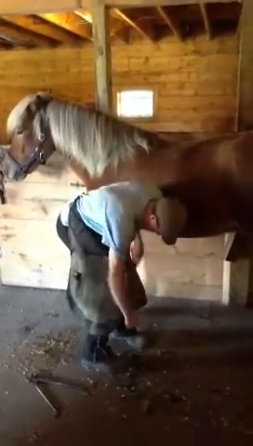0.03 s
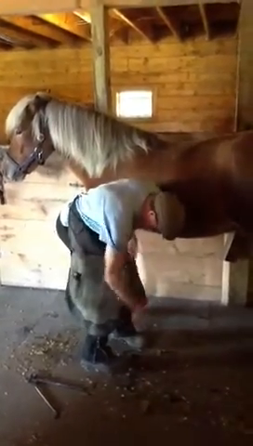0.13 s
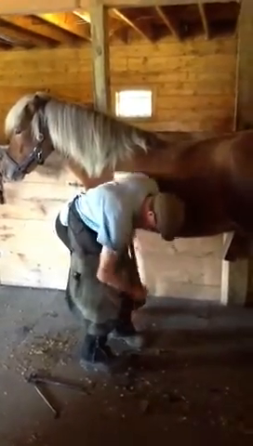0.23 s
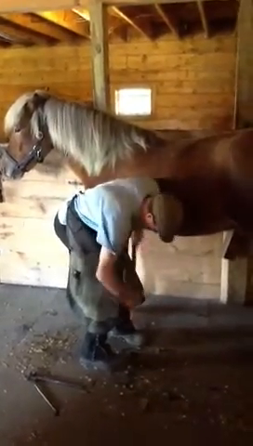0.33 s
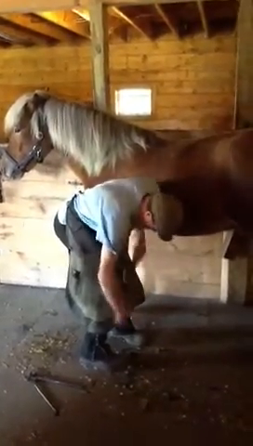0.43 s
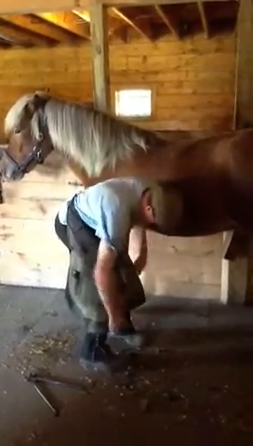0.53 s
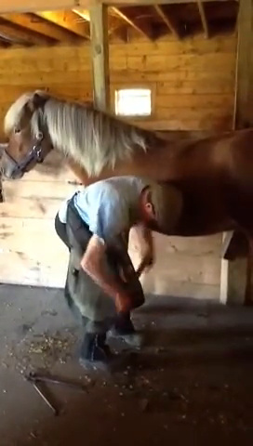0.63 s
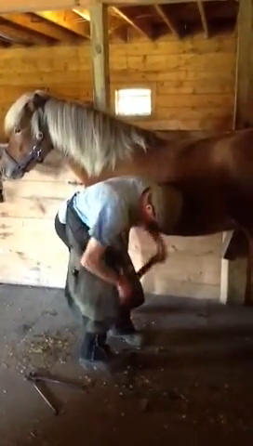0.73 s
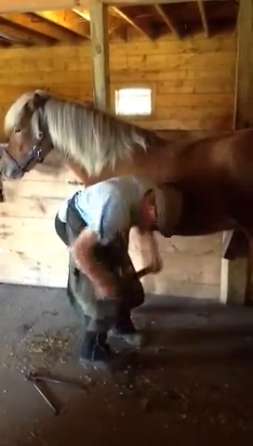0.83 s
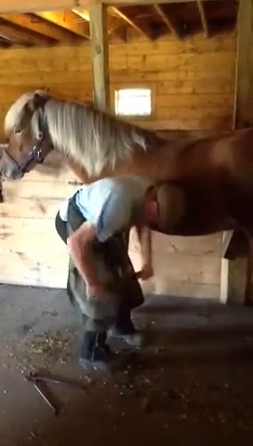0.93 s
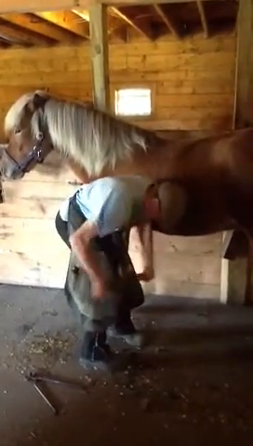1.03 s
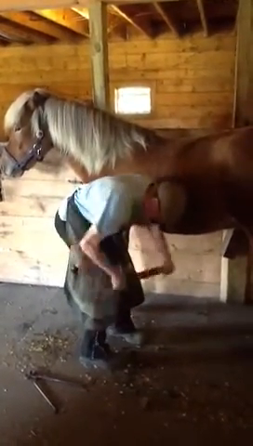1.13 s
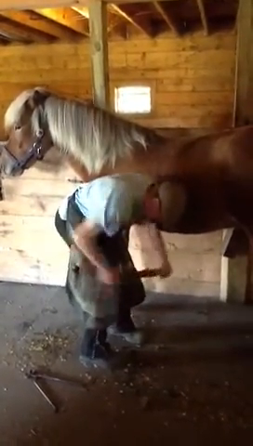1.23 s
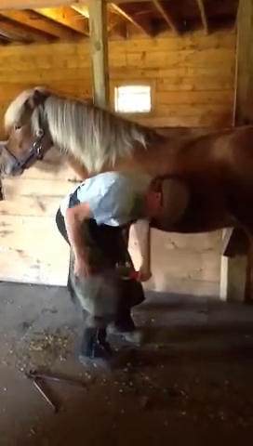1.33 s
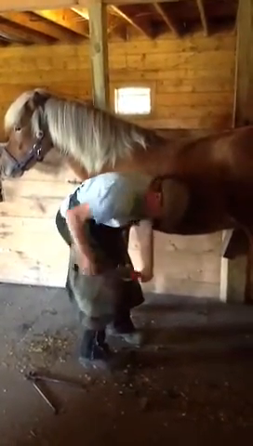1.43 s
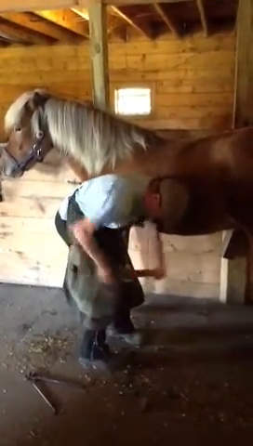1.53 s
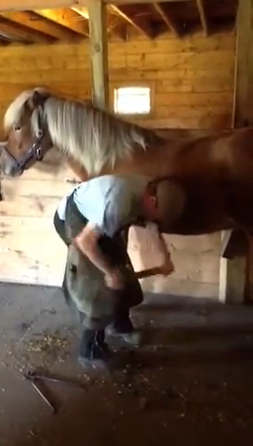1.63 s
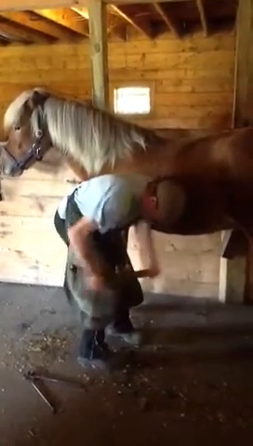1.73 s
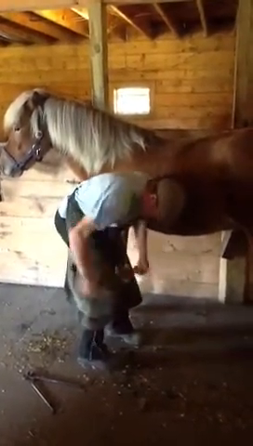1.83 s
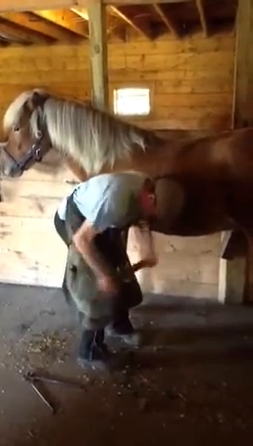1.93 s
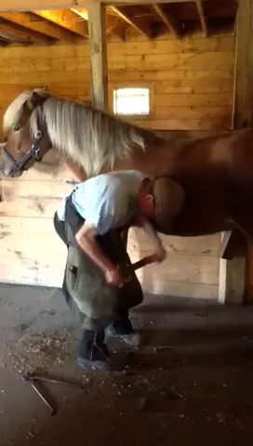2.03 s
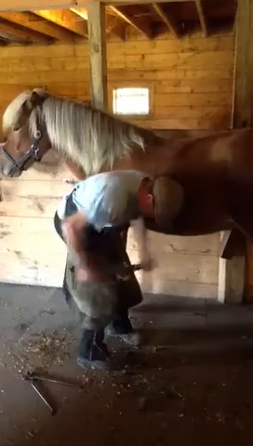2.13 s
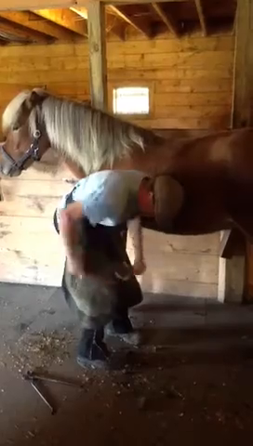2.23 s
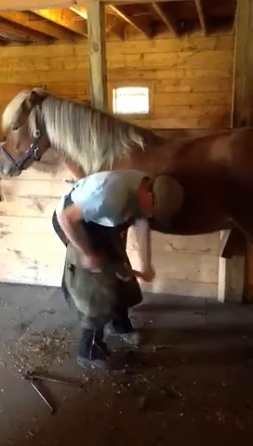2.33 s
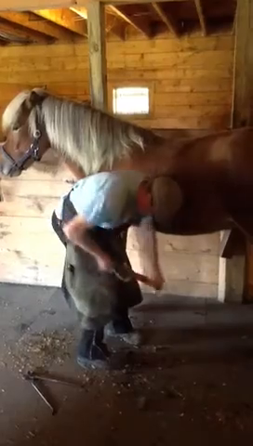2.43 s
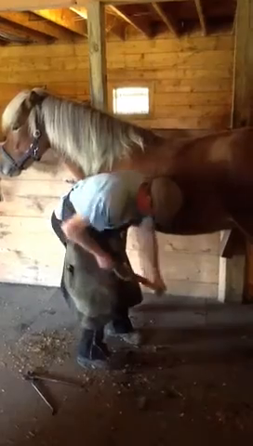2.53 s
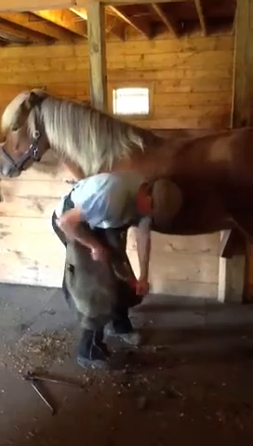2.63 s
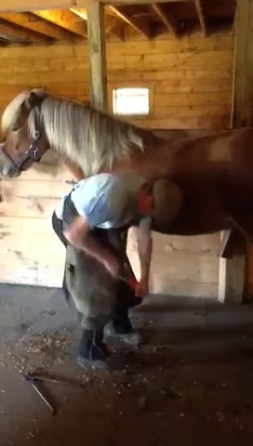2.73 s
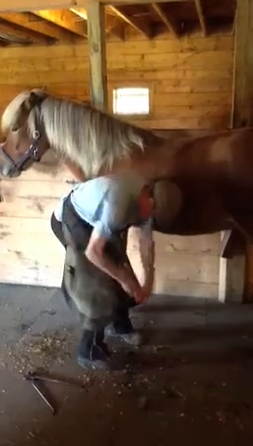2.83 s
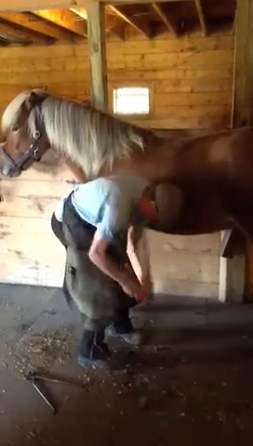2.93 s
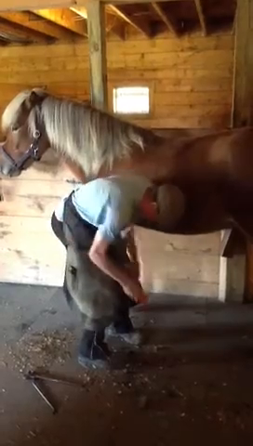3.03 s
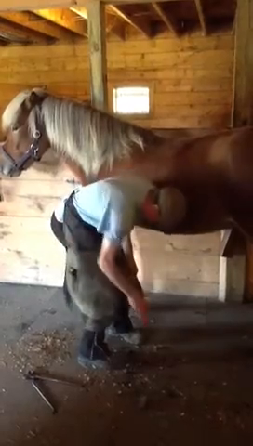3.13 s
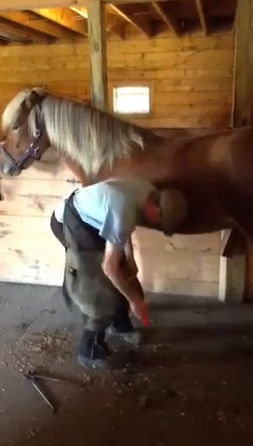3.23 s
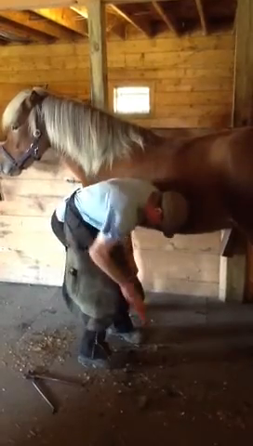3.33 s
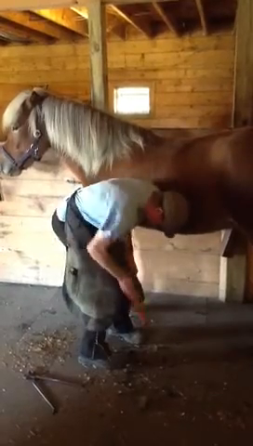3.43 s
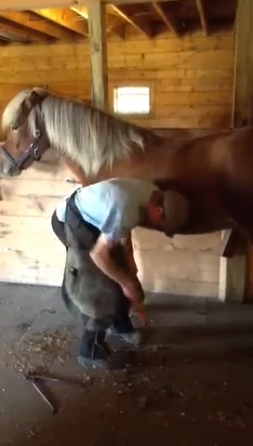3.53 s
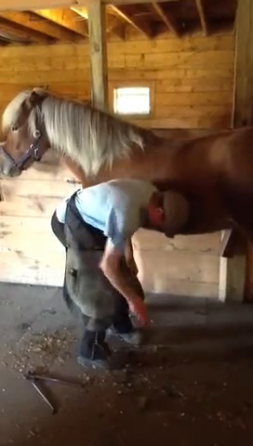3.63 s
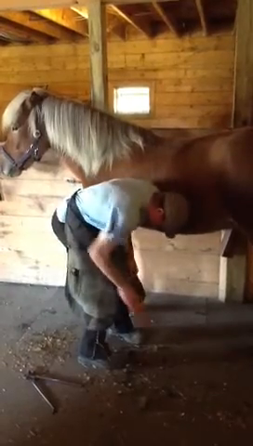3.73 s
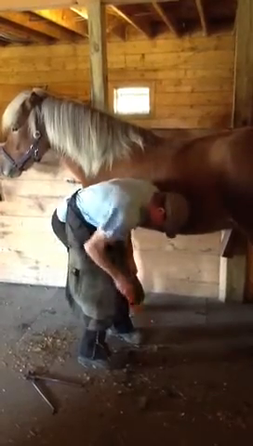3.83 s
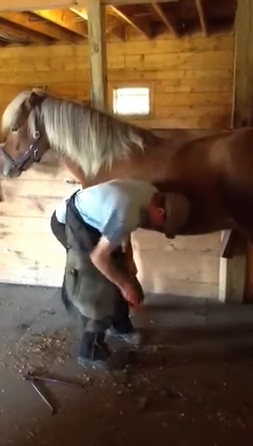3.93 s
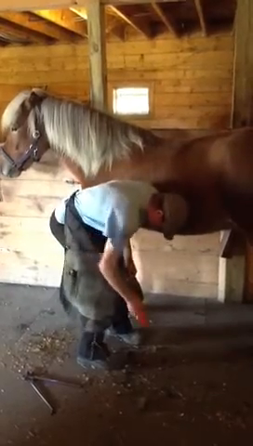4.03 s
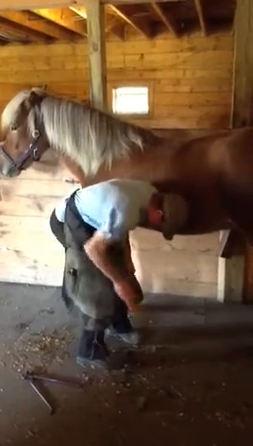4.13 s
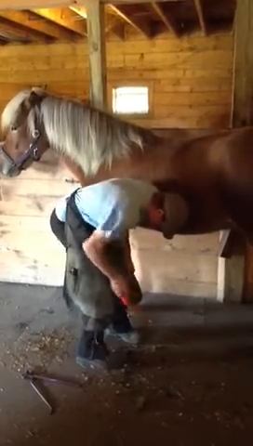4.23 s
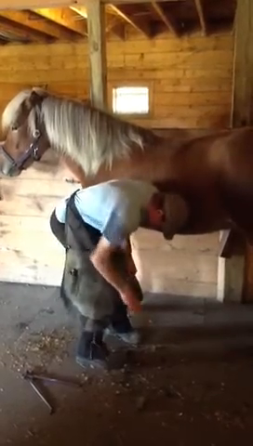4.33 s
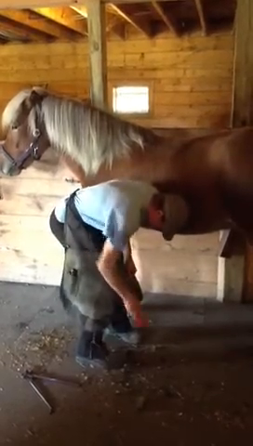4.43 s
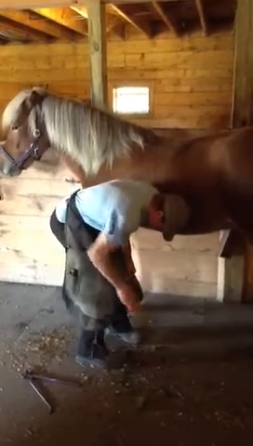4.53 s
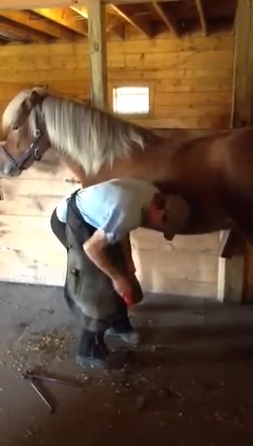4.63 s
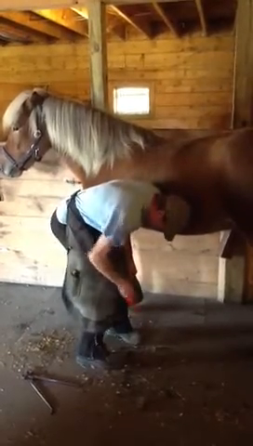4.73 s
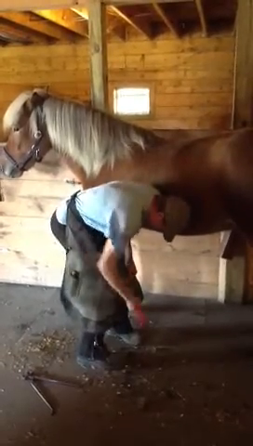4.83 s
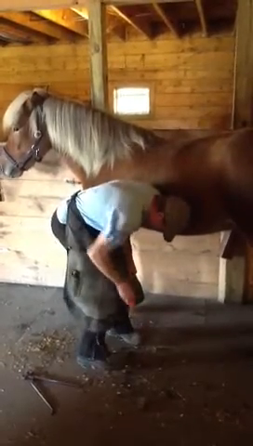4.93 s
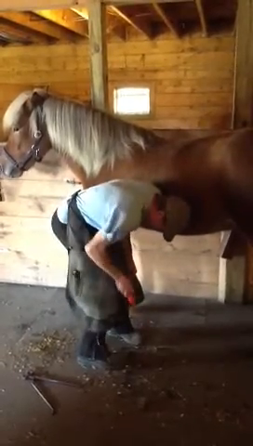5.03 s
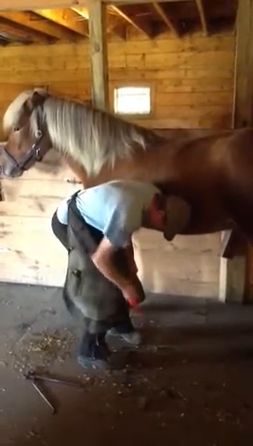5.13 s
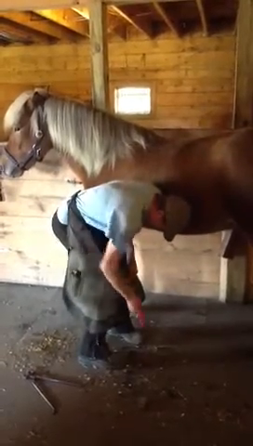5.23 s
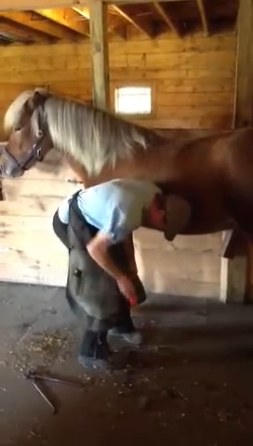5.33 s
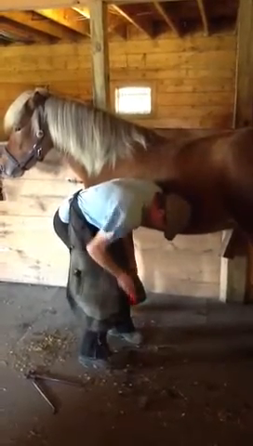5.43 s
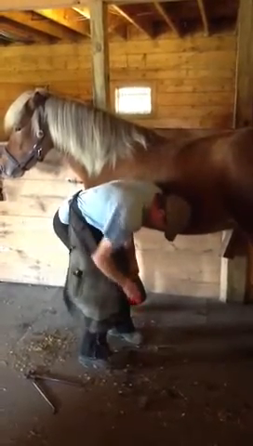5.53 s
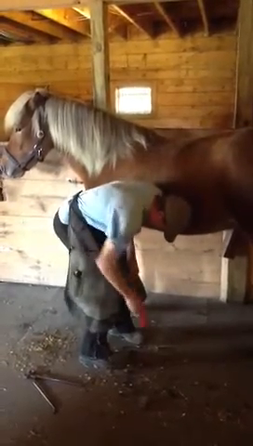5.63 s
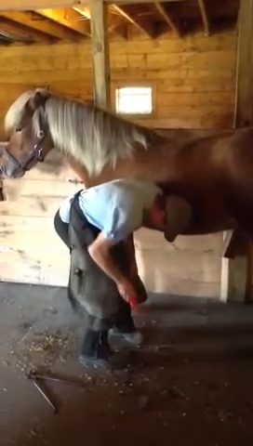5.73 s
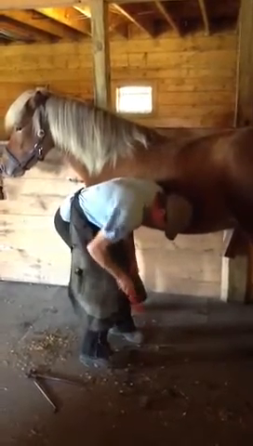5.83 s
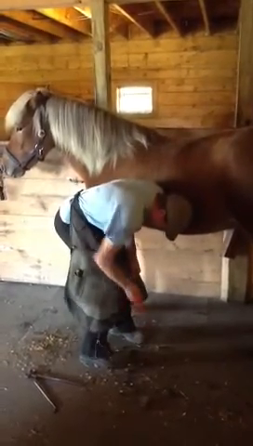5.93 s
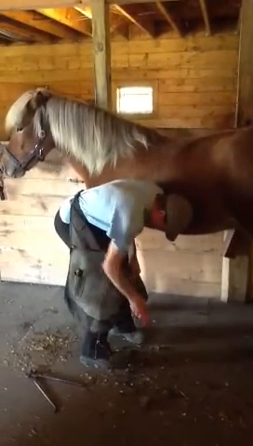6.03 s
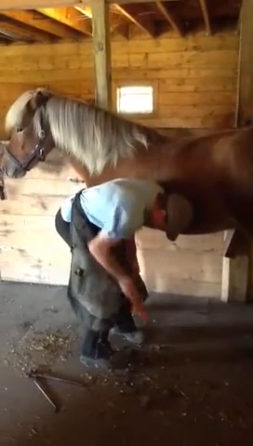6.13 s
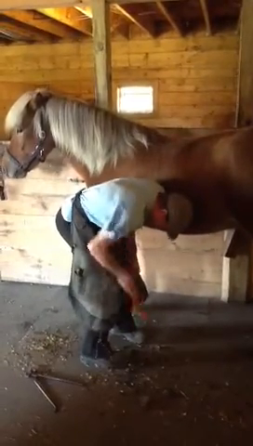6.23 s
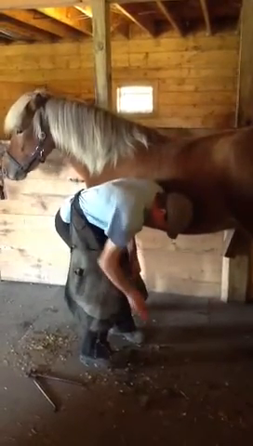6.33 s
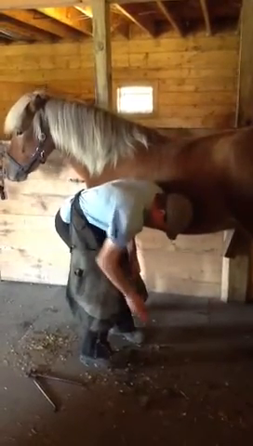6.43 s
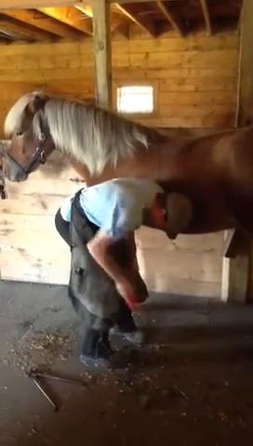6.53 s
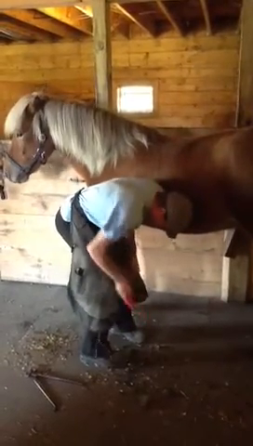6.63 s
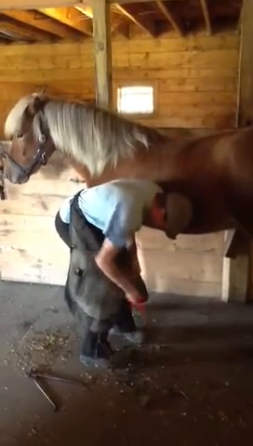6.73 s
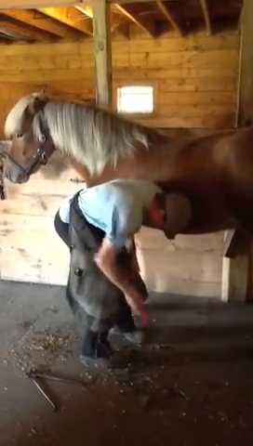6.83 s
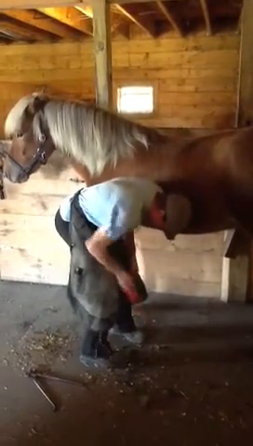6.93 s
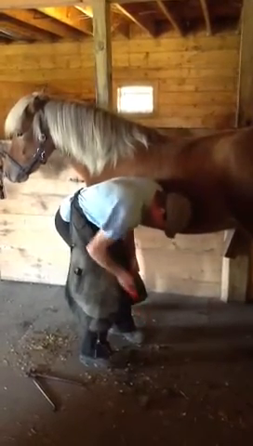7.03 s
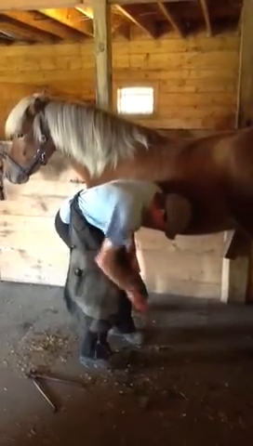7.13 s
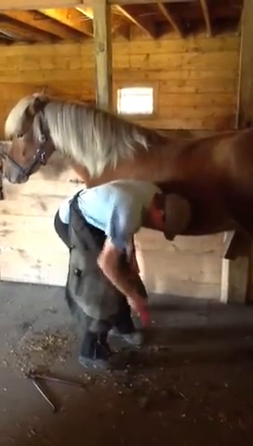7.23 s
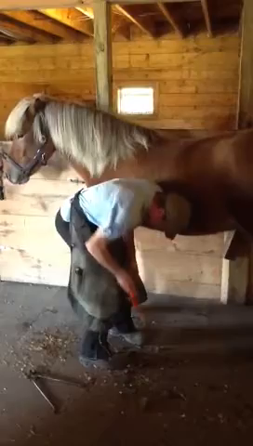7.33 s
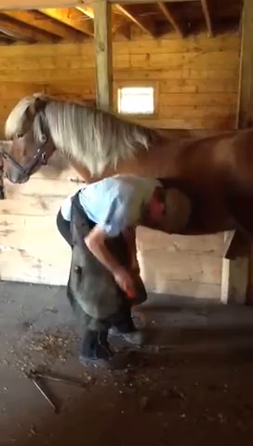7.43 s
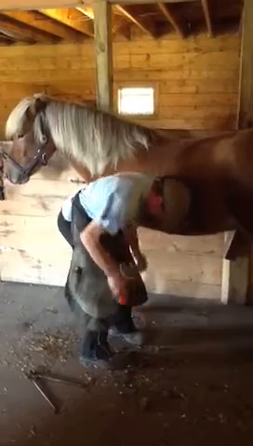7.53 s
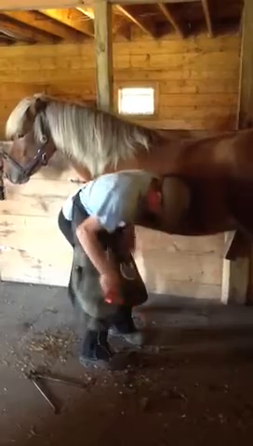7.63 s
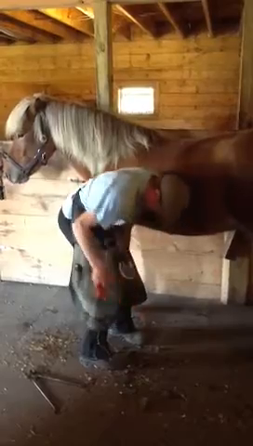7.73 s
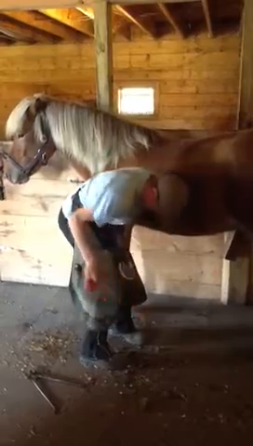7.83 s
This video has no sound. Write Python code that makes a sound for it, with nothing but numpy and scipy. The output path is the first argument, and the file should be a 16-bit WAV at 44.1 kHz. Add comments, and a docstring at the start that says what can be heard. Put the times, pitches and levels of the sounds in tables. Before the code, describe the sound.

In a quiet wooden stall, a steel rasp files a horse's hoof. From 0 to 1 s come three separated, gritty strokes, with small knocks and brief low hums. Between 1.2 and 2.3 s the strokes are fastest and loudest, rough and bright, shaking the leg with low jolts; a sharp snap clicks at 2.2 s and a hollow knock follows at 2.33. Scraping fades to soft rubs around 2.6 to 2.9 s. A firm double knock at 3.15 s begins steady, quieter to-and-fro rasping, strokes in uneven pairs, three or four a second, with knocks near 3.7, 4.3, 4.5, 4.9 and 5.75 s and faint steely ringing. At 6.33 s a hoof stamps once, a short dull thump on boards. Rasping continues until about 7.4 s, then dwindles into faint soft bumps. Mono, short woody echo, low steady air, little deep bass.

```python
"""A steel rasp is pushed to and fro over a horse's hoof: under a swelling force, dense random bites of its
teeth give coloured scrape and hoof-wall rings, a coarser judder shakes leg and hoof, and noise rings the
bar. Brief gliding hums, jolts of the leg and knocks join the strokes; a hoof stamps once on the boards as
a run of contacts ringing floor modes, and rubs are soft bumps ringing around one pitch.
Decaying noise gives the wooden stall's echo, steady noise its quiet air; both channels are the same."""
import sys
import numpy as np
from scipy import signal
from scipy.fft import rfft, irfft, next_fast_len
from scipy.io import wavfile

SR = 44100
rng = np.random.default_rng(int(sys.argv[2]) if len(sys.argv) > 2 else 0)


def wav_record(signal):
    """Record a signal, one row per channel, as 16-bit PCM in the file named by sys.argv[1]."""
    frames = np.transpose(np.atleast_2d(signal))
    bounded = np.clip(frames, -1, 1)
    # unit amplitude maps onto the largest positive 16-bit level
    quanta = np.round(bounded * 32767).astype(np.int16)
    wavfile.write(sys.argv[1], SR, quanta)


N = 348166   # samples

# Spectrum of teeth scraping on horn. Each row: frequency in Hz, relative level in dB per Hz.
SCRAPE_SPECTRUM = [(410, -6), (700, 4.5), (1390, -0.5), (1580, 10.5), (3170, 9), (4000, 12), (11400, 9),
                   (15300, 2.5)]
# Resonances of the hoof. Each row: frequency in Hz, bandwidth in Hz, relative level in dB.
HOOF_MODES = [(466, 110, 0.5), (635.5, 69, -1), (772, 54, -2), (936, 81, -4.5), (1143, 170, -4)]
# Resonances of the hoof wall. Each row: frequency in Hz, bandwidth in Hz, relative level in dB.
WALL_MODES = [(1650, 130, -2), (2130, 160, -1), (2450, 160, -2), (2900, 220, 0), (3390, 300, 0),
              (4640, 300, -4)]
# Resonances of the leg clamped between the knees. Each row: frequency in Hz, bandwidth in Hz,
# relative level in dB.
LEG_MODES = [(187, 10, -43.5), (242, 49, 6.5), (346, 51, 3.5)]
# How the hoof is held. Each row: time in seconds, leg against hoof in dB, hoof wall against scrape in dB.
HOLD = [(0, 4.5, -11), (1, -6, -7), (1.5, -9.5, -12.5), (2.4, -0.5, -7), (3.2, 2, -10), (3.8, 1.5, -15.5),
        (4.4, -1, -9), (5.3, -4.5, -14), (6.2, -2, -14), (7.3, -5, -13.5), (7.6, -19, 0)]


def rasp():
    """Random excitation: bites give scrape and wall, a coarser judder leg and hoof, noise the bar."""
    # Resonances of the steel bar. Each row: frequency in Hz, bandwidth in Hz, relative level in dB.
    bar_modes = [(11310, 36, 0), (11800, 40, -11)]
    fine_bites = teeth(per_s=9000, spread_db=-2.0, clump_db=1.35)
    torn_chips = teeth(per_s=550, spread_db=3.5, clump_db=1.0)
    bites = fine_bites + from_db(-10) * torn_chips

    hold_s, _, hold_wall_db = np.transpose(HOLD)
    wall_gain = from_db(np.interp(np.arange(N) / SR, hold_s, hold_wall_db))
    wall = wall_gain * wandering(bites, WALL_MODES, spread_db=2.5, rate=22, glide=0.025)
    scrape = coloured(bites, SCRAPE_SPECTRUM) + wall
    dull = signal.lfilter(*signal.butter(1, 6000, fs=SR), scrape)
    flutter = from_db(1.2 * drift(18))   # the edge flutters at random
    edge = (scrape - dull) * flutter

    judder = teeth(per_s=1200, spread_db=2.5, clump_db=0.0)   # the whole bar hops over ridges
    leg = wandering(judder, LEG_MODES, spread_db=2.0, rate=8, glide=0.07)
    hoof = wandering(judder, HOOF_MODES, spread_db=3.0, rate=10, glide=0.05)

    waver = from_db(3 * drift(30))   # the bar's ring wavers in level at random
    steel = rms_one(body(rng.standard_normal(N) * waver, bar_modes))
    parts = [rms_one(dull), rms_one(edge), leg, hoof, steel]
    return np.sum(stroke_gains() * parts, axis=0)


def stroke_gains():
    """Radiated level follows powers of the stroke's force; rows: scrape, edge, leg, hoof, bar."""
    # Push and pull strokes. Each row: full force in seconds, length in seconds, scrape level in dB,
    # edge against scrape in dB, shake of hoof and leg in dB, ring of the bar in dB.
    strokes = [(0.009, 0.29, -45, -8.5, -51, -58), (0.44, 0.43, -48, 7, -52.5, -62),
               (0.877, 0.37, -45, 4, -50.5, -52), (1.295, 0.32, -37.5, -1.5, -46.5, -68),
               (1.538, 0.24, -40, -11, -39.5, -51), (1.74, 0.3, -38.5, -1.5, -49, -71),
               (1.971, 0.26, -40.5, -15, -46.5, -58), (2.139, 0.3, -38.5, 0.5, -46.5, -53),
               (2.408, 0.33, -46, -7.5, -49, -56), (2.586, 0.33, -58.5, 15, -55, -83),
               (2.894, 0.17, -62.5, -8, -60.5, -89), (3.154, 0.39, -56, -29, -53, -74),
               (3.353, 0.26, -45.5, -7.5, -49, -56), (3.589, 0.23, -45.5, -4.5, -49, -56),
               (3.728, 0.3, -47, -4, -48.5, -55), (3.995, 0.25, -45.5, -6, -47, -64),
               (4.113, 0.26, -49.5, 0, -45, -56.5), (4.389, 0.23, -49.5, -3, -47.5, -63.5),
               (4.536, 0.34, -53, 2, -47.5, -58.5), (4.798, 0.24, -51, -0.5, -46.5, -67),
               (4.935, 0.28, -48, -2, -46.5, -53), (5.177, 0.24, -48.5, -12, -49, -57),
               (5.328, 0.24, -42.5, -1.5, -44, -49), (5.562, .21, -43.5, -7, -47, -51),
               (5.698, 0.31, -46.5, -2.5, -45.5, -55), (5.981, 0.24, -46, -4.5, -47.5, -60),
               (6.114, 0.26, -44.5, 0, -47, -56), (6.368, 0.26, -47.5, -4.5, -47, -56),
               (6.481, 0.28, -45.5, -3, -44, -54), (6.761, 0.27, -51, -6, -49.5, -64),
               (6.904, 0.27, -44.5, -0.5, -48.5, -51), (7.168, 0.26, -43.5, -6.5, -47.5, -54.5),
               (7.303, 0.27, -45, 0, -46.5, -54), (7.514, 0.45, -60, -34, -56, -90)]
    gains, t = np.zeros((5, N)), np.arange(N) / SR
    gaps = np.minimum(np.diff(np.transpose(strokes)[0]), 0.256)   # longest gap that counts, s
    before, after = np.r_[gaps[0], gaps], np.r_[gaps, gaps[-1]]
    # the share spent rising grows with each doubling of the gap before against the gap after
    rise_shares = 0.48 + 0.15 * np.log2(before / after)
    bite_at, bite_over = 0.69, 0.074   # share of the rise still ahead at the catch, share it takes
    powers = np.c_[[2.74, 4.7, 2.0, 2.3, 5.9]]   # the edge needs speed; leg and hoof shake all along
    for (s, length, scrape_db, edge_db, shake_db, bar_db), share in zip(strokes, rise_shares):
        rise, fall = share * length, (1 - share) * length
        span = slice(max(0, int((s - rise) * SR)), int((s + fall) * SR))
        from_peak = t[span] - s
        phase = np.where(from_peak < 0, from_peak / rise, from_peak / fall)
        swell = np.minimum(np.abs(np.cos(phase * np.pi / 2)), 1)
        caught = np.clip((phase + bite_at) / bite_over, 0, 1)   # the teeth catch suddenly
        leg_db = shake_db + np.interp(s, *np.transpose(HOLD)[:2])
        levels_db = [scrape_db, scrape_db + edge_db, leg_db, shake_db, bar_db]
        gains[:, span] += from_db(levels_db)[:, None] * swell ** powers * caught
    # edge and bar are brightest just before full force
    for row, lead_s in ((1, 0.0013), (4, 0.0069)):
        gains[row] = np.interp(t + lead_s, t, gains[row])
    return gains


def hums():
    """Periodic excitation: evenly passing rows of teeth give a gliding, slightly unsteady tone."""
    # Moments of even passing. Each row: start in seconds, length in seconds, first frequency in Hz,
    # last frequency in Hz, level in dB before the unevenness.
    hum_table = [(0.386, 0.079, 363, 371, -45), (0.775, 0.074, 230, 346, -45), (0.843, 0.12, 335, 273, -53),
                 (1.478, 0.037, 1637, 1720, -38.5), (1.498, 0.069, 715, 610, -41),
                 (1.728, .065, 708, 724, -52.5), (3.151, 0.043, 803, 772, -47),
                 (3.522, 0.07, 839, 650, -47.5), (3.962, 0.076, 987, 974, -43.5),
                 (4.087, 0.024, 260, 416, -44), (4.333, 0.056, 681, 638, -46.5),
                 (4.789, 0.038, 965, 1010, -44), (4.881, 0.027, 533, 640, -44),
                 (7.102, 0.086, 730, 1038, -46), (7.271, 0.034, 368, 274, -43)]
    out, wobble, uneven = np.zeros(N), drift(60), from_db(4 * drift(70))
    for s, length, first_hz, last_hz, level_db in hum_table:
        i, n = int(s * SR), int(length * SR)
        hz = np.linspace(first_hz, last_hz, n) * (1 + 0.046 * wobble[i:i + n])
        tone = np.sin(2 * np.pi * np.cumsum(hz) / SR)
        shape = np.hanning(n) ** 0.21 * uneven[i:i + n]
        out[i:i + n] += from_db(level_db) * shape * tone
    return out


def jolts():
    """Resonant forcing: a few cycles at one of the leg's own resonances shake it under the push."""
    # Jolts of the leg. Each row: time in seconds, peak level in dB.
    jolt_table = [(0.262, -47.5), (0.788, -48), (1.229, -43.5), (1.321, -38.5), (1.444, -40),
                  (1.575, -34.5), (1.733, -33.5), (1.973, -41.5), (3.099, -44), (3.173, -43),
                  (3.514, -40.5), (4.005, -33.5), (4.139, -41.5), (4.404, -43.5), (4.824, -44.5),
                  (5.675, -39), (6.091, -38.5), (7.276, -43.5)]
    s, peak_db = np.transpose(jolt_table)
    t = np.arange(int(0.034 * SR)) / SR
    shake = np.hanning(len(t)) * np.sin(2 * np.pi * LEG_MODES[1][0] * t)
    return strike(s - 0.013, peak_db, shake, LEG_MODES)   # the swell starts before the listed time


def knocks():
    """Impact excitation: a rattling touch rings leg, hoof and wall, with a snap and a short scuff."""
    # The rasp set down or catching on the hoof. Each row: time in seconds, peak level in dB,
    # snap level in dB, scuff level in dB.
    knock_table = [(0.256, -44, -62, -59), (0.740, -37, -72, -77), (1.1321, -34, -68, -48),
                   (1.493, -37, -41, -42), (2.1945, -36, -14, -44), (2.334, -30.5, -34, -60),
                   (2.848, -52, -55, -57), (3.13, -34, -42, -61), (3.156, -27.5, -46, -59),
                   (3.712, -31, -47, -42), (4.327, -36.5, -54, -47), (4.517, -31.5, -46, -41),
                   (4.931, -28.5, -50, -43), (5.746, -32.5, -67, -65)]
    s, peak_db, snap_db, scuff_db = np.transpose(knock_table)
    t = np.arange(int(0.052 * SR)) / SR
    rattle = (t == 0) + 0.03 * rng.standard_normal(len(t)) * np.exp(-t / 0.03)
    # a knock wakes the wall only faintly
    faint_wall = [(hz, width, level_db - 14) for hz, width, level_db in WALL_MODES]
    thumps = strike(s, peak_db, rattle, LEG_MODES + HOOF_MODES + faint_wall)
    snaps = ring(clicks_at(s, from_db(snap_db)), hz=2500, t60=0.0018)
    scuff_decay = from_db(-60 / (0.14 * SR))   # 60 dB in 0.14 s
    scuff_gain = signal.lfilter([1], [1, -scuff_decay], clicks_at(s, from_db(scuff_db)))
    return thumps + snaps + scuff_gain * coloured(rng.standard_normal(N), SCRAPE_SPECTRUM)


def stamp():
    """Modal excitation of a floor: dense contacts rumble in the boards and darken as the load eases."""
    # Resonances of the floor boards. Each row: frequency in Hz, bandwidth in Hz, relative level in dB.
    board_modes = [(95, 30, -19), (125, 30, -15), (163, 27, 0), (196, 30, -3), (240, 30, -2),
                   (310, 50, -13), (375, 45, -11), (488, 60, -11), (555, 60, -13), (660, 80, -16),
                   (780, 60, -15)]
    stamp_s, attack_s, hold_s, stamp_db = 6.327, 0.012, 0.085, -25.5
    t = np.arange(N) / SR - stamp_s
    touch = np.clip(t / attack_s, 0, 1)
    easing_s = np.clip(t - hold_s, 0, 1)
    contacts = teeth(per_s=2500, spread_db=1.0, clump_db=0.5)
    # the weight arrives as one soft push among the contacts
    blow = clicks_at([stamp_s + 0.0119], from_db(-3))
    contacts = contacts + np.convolve(blow, np.hanning(int(0.0033 * SR)))[:N]
    thud = (205, 180, -9)    # dull push of the floor as a whole
    clap = (800, 700, -19)   # broad clap of the hoof's rim
    floor = board_modes + [thud, clap]
    out = np.zeros(N)
    for k, mode in enumerate(floor):
        fade_db_per_s = 255 + 170 * mode[0] / 700   # higher modes lose their load faster
        load = touch * from_db(stamp_db - fade_db_per_s * easing_s)
        out += (-1) ** k * body(contacts * load, [mode])
    return out / np.std(body(contacts, floor))


def rubs():
    """Granular friction: short runs of soft, uneven bumps ring dully around one pitch and fade."""
    # Boot or apron rubs and bumps. Each row: start in seconds, length in seconds,
    # rms level in dB before fade and filter, pitch in Hz.
    rub_table = [(2.642, 0.12, -45, 420), (2.857, 0.11, -55, 400), (6.677, 0.054, -49.5, 307),
                 (7.668, 0.096, -51.5, 295), (7.772, .04, -59.5, 226), (7.864, .04, -62, 290)]
    out, t = np.zeros(N), np.arange(N) / SR
    bumps = teeth(per_s=800, spread_db=1.5, clump_db=1.5)
    for s, length, level_db, hz in rub_table:
        width = 0.63 * hz   # broad resonances, hence a dull ring
        rung = rms_one(body(bumps, [(hz, width, 0), (1.68 * hz, width, -15)]))
        attack = np.clip((t - s) / 0.0092, 0, 1)
        fade = np.clip(1 - (t - s) / length, 0, 1) ** 0.17
        out += from_db(level_db) * attack * fade * rung
    return signal.sosfilt(signal.butter(2, [150, 1100], "band", fs=SR, output="sos"), out)


def stall(x):
    """Reverberation: dense echoes from board walls decay exponentially, the treble sooner."""
    bass_t60_s, treble_t60_s = 0.65, 0.27
    t = np.arange(SR) / SR
    noise = rng.standard_normal(SR)
    bass = signal.lfilter(*signal.butter(1, 2500, fs=SR), noise)
    treble = noise - bass
    tail = bass * from_db(-60 * t / bass_t60_s) + treble * from_db(-60 * t / treble_t60_s)
    tail = tail * np.clip(t / 0.006 - 0.5, 0, 1)   # silent until the first bounce at 3 ms
    return signal.fftconvolve(x, tail / np.sqrt(np.sum(tail ** 2)))[:N]


def air():
    """Stationary background: random noise with a fixed spectrum."""
    # Spectrum of the quiet air. Each row: frequency in Hz, relative level in dB per Hz.
    air_spectrum = [(35, -45), (60, -5), (247, 10), (843, 8.5), (1940, 1), (3020, 0.5), (7290, -2.5),
                    (8370, 2), (11900, -6.5), (15300, -5)]
    return from_db(-62) * coloured(rng.standard_normal(N), air_spectrum)


def teeth(per_s, spread_db, clump_db):
    """Poisson-like impulses: bites at random moments, of uneven size, coming in clumps; rms 1."""
    sizes = from_db(spread_db * np.minimum(rng.exponential(1, N), 4))
    signs = rng.choice([-1, 1], N)
    happens = rng.random(N) < per_s / SR
    clumps = from_db(clump_db * drift(38))
    return rms_one(sizes * signs * happens * clumps)


def wandering(x, modes, spread_db, rate, glide):
    """Moving contact point: each resonance comes and goes and slides in pitch; rms 1."""
    out, push = 0, np.diff(x, prepend=0)   # little push below the resonances
    for hz, width, level_db in modes:
        gliding_hz = hz * (1 + glide * drift(rate))
        turn = np.exp(2j * np.pi * np.cumsum(gliding_hz) / SR)
        r = np.exp(-np.pi * width / SR)
        drive = push * from_db(spread_db * drift(rate))
        rung = signal.lfilter([1], [1, -r], drive / turn) * turn
        out = out + from_db(level_db) * rms_one(rung.imag)
    return rms_one(out)


def strike(times, peaks_db, touch, modes):
    """Impulse response by convolution: one touch rings the modes, each blow scaled to its own peak."""
    answer = body(np.pad(touch, (0, SR // 5)), modes)
    return signal.fftconvolve(clicks_at(times, from_db(peaks_db)), answer / np.abs(answer).max())[:N]


def body(x, modes):
    """Modal superposition: parallel resonances, each with rms at its dB for white input of rms 1."""
    out = 0
    for k, (hz, width, level_db) in enumerate(modes):
        t60 = np.log(1000) / (np.pi * width)
        unit = np.sqrt(4 * np.pi * width / SR)   # brings the ring to rms 1
        out = out + (-1) ** k * from_db(level_db) * unit * ring(x, hz, t60)
    return out


def ring(clicks, hz, t60):
    """Damped oscillator: a unit click starts a decaying sine of initial height 1."""
    r, w = from_db(-60 / (t60 * SR)), 2 * np.pi * hz / SR
    return signal.lfilter([0, np.sin(w)], [1, -2 * r * np.cos(w), r * r], clicks + 1e-18)


def clicks_at(times, gains):
    """Impulse train: single-sample clicks at times in seconds."""
    out = np.zeros(N)
    out[(np.asarray(times) * SR).astype(int)] = gains
    return out


def coloured(x, spectrum):
    """Linear filtering: x shaped by a spectrum of (Hz, dB) points; rms 1."""
    size = next_fast_len(N)
    hz, level_db = np.transpose(spectrum)
    log_hz = np.log(np.arange(size // 2 + 1) * SR / size + 1)
    gain = from_db(np.interp(log_hz, np.log(hz), level_db))
    return rms_one(irfft(rfft(x, size) * gain, size)[:N])


def drift(rate):
    """Low-pass random process: slow chance of rms 1, with its corner near rate in Hz."""
    r = np.exp(-2 * np.pi * rate / SR)
    noise = rng.standard_normal(N + SR)   # the first second lets the filter settle
    return rms_one(signal.lfilter([1], [1, -2 * r, r * r], noise)[SR:])


def rms_one(x):
    """Energy normalisation: x scaled to rms 1."""
    return x / np.sqrt(np.mean(x ** 2) + 1e-20)


def from_db(db):
    """Logarithmic level: the amplitude gain of a level in dB."""
    return 10 ** (np.asarray(db) / 20)


def scene():
    """Superposition of all sources, the stall's echo and the quiet air, alike in both channels."""
    handwork = rasp() + hums() + jolts() + knocks()
    # the handwork keeps little deep bass
    handwork = signal.sosfilt(signal.butter(4, 135, "high", fs=SR, output="sos"), handwork)
    direct = handwork + rubs() + stamp()
    return np.tile(direct + from_db(-7.5) * stall(direct) + air(), (2, 1))


def record(dry):
    """Band limiting: a small microphone loses the deep bass; the top is cut."""
    thin = signal.sosfilt(signal.butter(4, 105, "high", fs=SR, output="sos"), dry)
    return signal.sosfilt(signal.ellip(12, 0.5, 75, 15380, fs=SR, output="sos"), thin)


dry = scene()
out = record(dry)
wav_record(out)
```